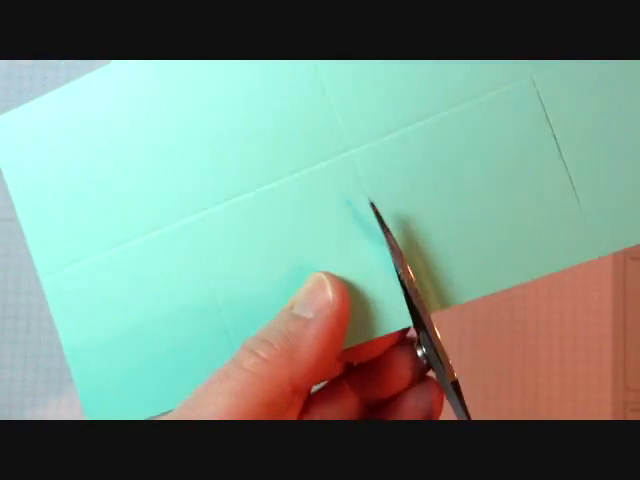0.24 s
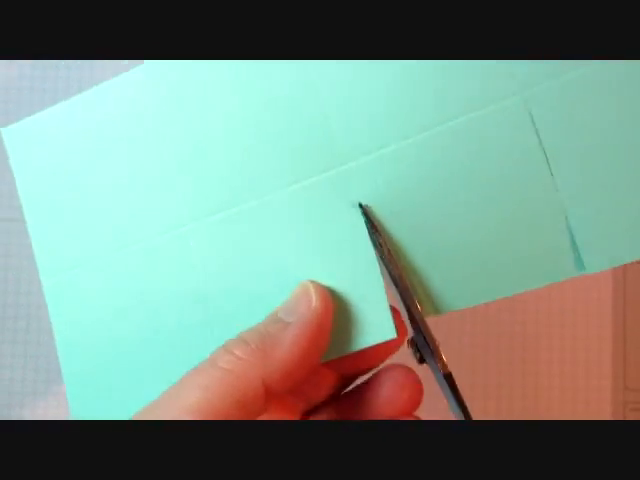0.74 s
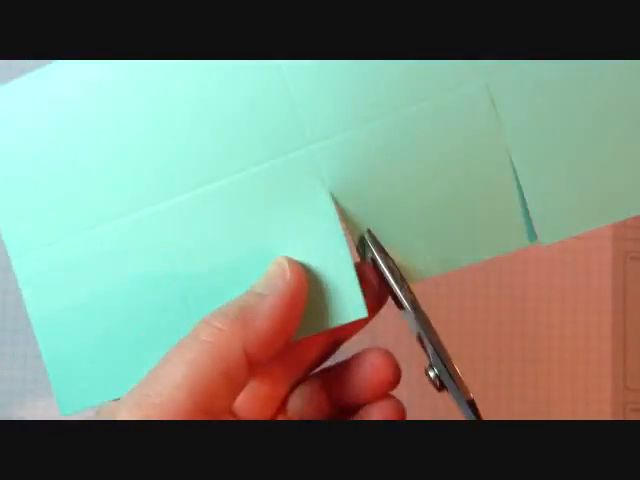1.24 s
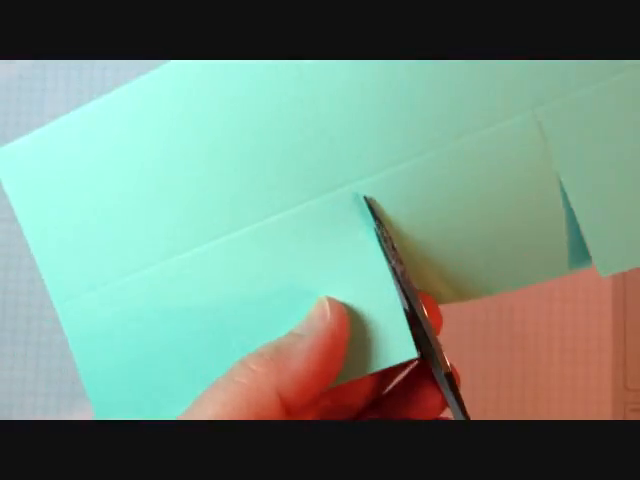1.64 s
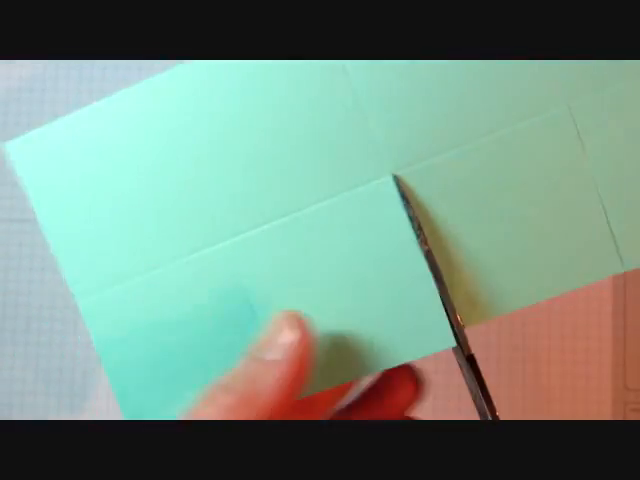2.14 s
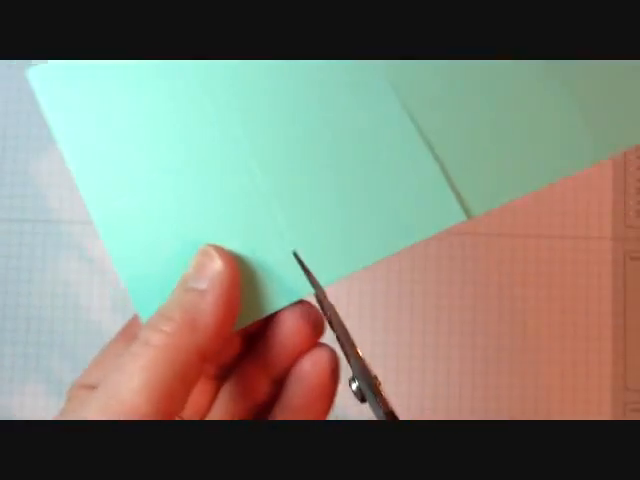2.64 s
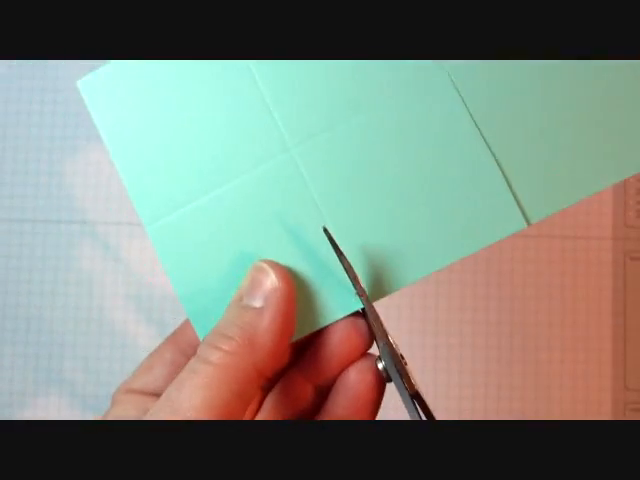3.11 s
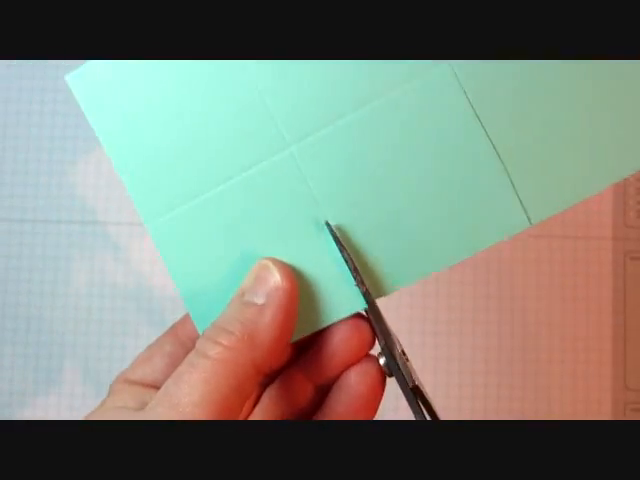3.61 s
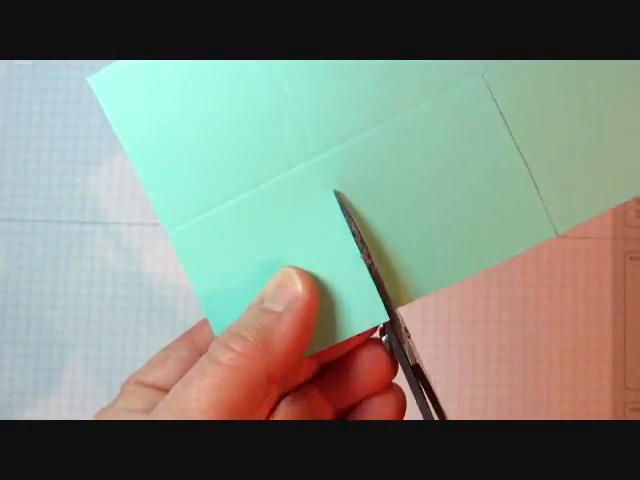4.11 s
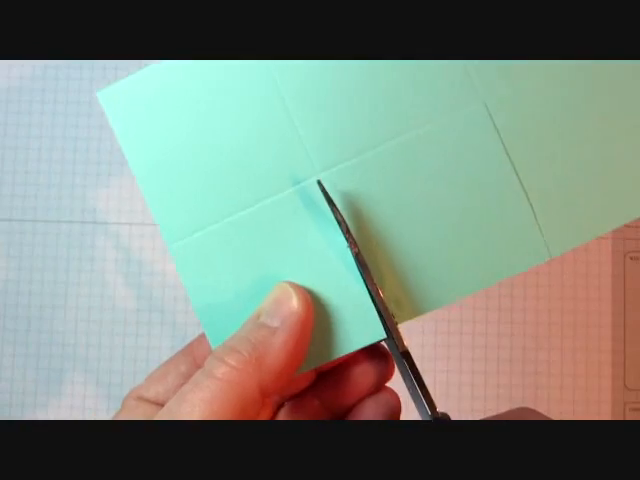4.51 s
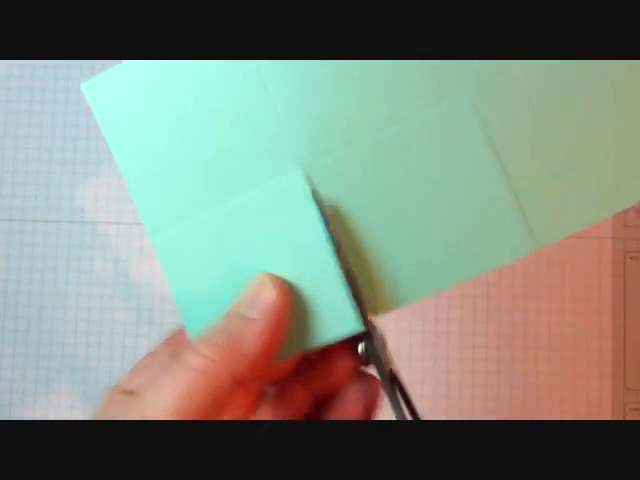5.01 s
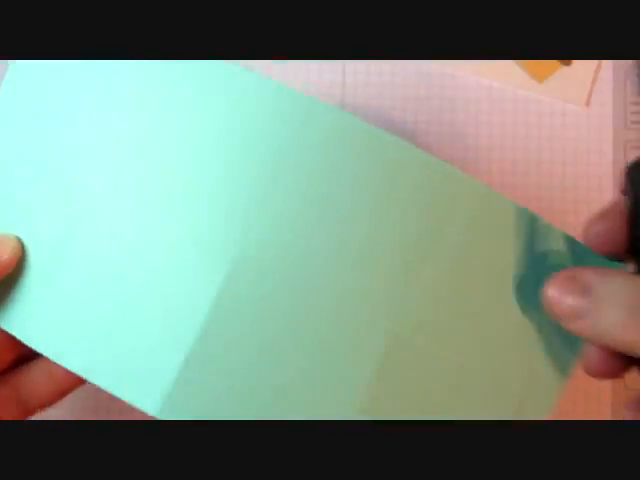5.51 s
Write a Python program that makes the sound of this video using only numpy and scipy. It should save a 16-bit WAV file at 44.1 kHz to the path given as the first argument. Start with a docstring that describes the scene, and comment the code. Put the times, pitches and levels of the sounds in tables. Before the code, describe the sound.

Scissors cut through a sheet of stiff cardstock, close to the microphone in a small room. Short, uneven crunches alternate with soft scrapes of steel along the card and sharp clicks of the blades. Midway the sheet flexes with a hollow crackle, there is a brief lull, and a second run of snips follows. A faint steady hiss lies underneath.

```python
"""At a craft table in a small room, scissors cut two slits in a sheet of cardstock held close by.
Fibres fracture in dense grains, steel slides on the card by stick-slip friction, the sheet buckles
and the blades click shut. These forces excite the resonances of the stiff sheet, the blades and
the room, over faint hiss and a thin electronic whine."""
import sys
import numpy as np
from scipy import signal
from scipy.fft import rfft, irfft
from scipy.io import wavfile
from scipy.ndimage import uniform_filter1d

SR = 44100
rng = np.random.default_rng(int(sys.argv[2]) if len(sys.argv) > 2 else 0)


def store_wav(level_fs):
    """Save 16-bit WAV to argv[1]."""
    pcm = np.round(np.clip(np.atleast_2d(level_fs), -1, 1) * 32767)
    wavfile.write(sys.argv[1], SR, pcm.T.astype(np.int16))


N = 253575
TIME = np.arange(N) / SR
# decay of each kind of stroke once the hand stops pushing
CUT_RELEASE_DB_PER_S, SLIDE_RELEASE_DB_PER_S, BEND_RELEASE_DB_PER_S = 684, 492, 520


def amp(db):
    """Decibels to amplitude ratio."""
    return 10 ** (np.asarray(db) / 20)


def unit_energy(x):
    """Normalisation to an energy of one."""
    return x / np.sqrt(np.sum(x ** 2))


def decay(t, t60):
    """Exponential damping, 60 dB down after t60 seconds."""
    return np.exp(-np.log(1000) * t / t60)


def spectrum_db(points, hz):
    """Spectral envelope: points joined on a log-frequency axis."""
    points_hz, db = np.transpose(points)
    return np.interp(np.log(hz + 1), np.log(points_hz), db)


# Noise spectra, in phase (mid) and opposed (side) at the ears: frequency_hz, relative_density_db
HISS_MID = [(15, -42), (25, -10), (49, -7.5), (67, -6), (86, -9), (213, -9), (243, -4.5), (271, -6.5),
            (529, -9.5), (1310, -2.5), (1810, -9), (3180, -11), (6040, -14.5), (8100, -15.5),
            (15000, -23.5)]
HISS_SIDE = [(15, -36), (25, -9), (181, -8.5), (213, -5.5), (373, -6), (621, -9), (691, 1), (749, -11),
             (856, -4.5), (1150, -6.5), (1240, -7), (3180, -14.5), (3630, -16), (5570, -18.5),
             (15000, -31.5)]
def hiss():
    """Stationary broadband noise, mostly in antiphase between the ears."""
    hz = np.arange(N + 1) * SR / (2 * N)
    def noise(points, rms_db):
        shaped = irfft(rfft(rng.standard_normal(2 * N)) * amp(spectrum_db(points, hz)))[:N]
        return amp(rms_db) * np.sqrt(N) * unit_energy(shaped)
    mid, side = noise(HISS_MID, rms_db=-56.5), noise(HISS_SIDE, rms_db=-46.5)
    return np.array([mid + side, mid - side])


# Partials of the electronic whine: pitch_hz, rms_db
WHINE_PARTIALS = [(7867, -78), (15734, -74)]
def whine():
    """Harmonic pair: two steady pure tones an octave apart."""
    return sum(amp(db) * np.sqrt(2) * np.sin(2 * np.pi * hz * TIME) for hz, db in WHINE_PARTIALS)


# Middle, bass and treble bands: low_hz, high_hz
BAND_EDGES = [(700, 4000), (100, 700), (4000, 16000)]
def crossover(x):
    """Fourth-order crossover filters divide a signal into middle, bass and treble."""
    def twice(v, edge_hz, kind):
        sos = signal.butter(2, edge_hz, kind, fs=SR, output="sos")
        return signal.sosfilt(sos, signal.sosfilt(sos, v))
    low_hz, high_hz = BAND_EDGES[0]
    upper = twice(x, low_hz, "high")
    return twice(upper, high_hz, "low"), twice(x, low_hz, "low"), twice(upper, high_hz, "high")


# Resonances of the held sheet and scissors: frequency_hz, width_hz, lift_db
SHEET_MODES = [(348, 46, 10.5), (444, 40, 11), (625, 224, 11.5), (771, 172, 10), (890, 74, 10.5),
               (1139, 285, 10.5), (1303, 172, 8), (1400, 106, 9.5), (1525, 45, 10), (1760, 287, 11.5),
               (2184, 200, 5.5), (2444, 420, 6), (2896, 23, 5), (3180, 540, 5), (3580, 50, 5.5),
               (4154, 230, 4)]
def sheet_response(radiation, size=4096):
    """Minimum-phase impulse response: resonance peaks on a smooth radiation spectrum."""
    hz = np.arange(size // 2 + 1) * SR / size
    peaks_db = sum(lift / (1 + (2 * (hz - centre) / width) ** 2) for centre, width, lift in SHEET_MODES)
    cepstrum = irfft(np.log(amp(spectrum_db(radiation, hz) + peaks_db)))
    cepstrum[1:size // 2] *= 2  # folding the cepstrum makes the response causal
    cepstrum[size // 2 + 1:] = 0
    return irfft(np.exp(rfft(cepstrum)))


# Natural modes of the steel blades: pitch_hz, relative_level_db, t60_s
STEEL_MODES = [(775, -5, 0.23), (1165, -11, 0.33), (1245, 1, 0.079), (1380, -4, 0.09), (1800, -24.5, 0.097),
               (2175, -7, 0.17), (2325, -11, 0.11)]
def blade_modes(t):
    """Free vibration: one damped sinusoid for each mode."""
    return np.array([amp(db) * decay(t, t60) * np.sin(2 * np.pi * hz * t)
                     for hz, db, t60 in STEEL_MODES])


def transfer_path(radiation, flutter_db, flutter_t60, blade_db, room_db, room_t60, side_db, size=22050):
    """Impulse responses from blade edge to both ears, normalised in each of the three bands."""
    t = TIME[:size]
    noise = rng.standard_normal((4, size))
    flutter = noise[:2] * decay(t, flutter_t60)  # bending waves reflect between the sheet's edges
    room = noise[2:] * decay(t, room_t60) * np.clip(t / 0.014, 0, 1)
    mid = (t == 0) + amp(flutter_db) * unit_energy(flutter[0]) + amp(room_db) * unit_energy(room[0])
    side = amp(side_db) * unit_energy(flutter[1]) + amp(room_db) * unit_energy(room[1])
    sheet = unit_energy(sheet_response(radiation))
    mid, side = (signal.fftconvolve(v, sheet)[:size] for v in (mid, side))
    mid = mid + amp(blade_db) * unit_energy(blade_modes(t).sum(axis=0))
    ears = np.array([mid + side, mid - side])
    return [band / np.linalg.norm(band.mean(axis=0)) for band in crossover(ears)]


# Radiation spectra of the card for each kind of contact: frequency_hz, relative_level_db
TORN_SPECTRUM = [(60, -18), (150, -6.5), (300, 1.5), (500, -5), (1200, -6.5), (2000, -4), (3000, -2),
                 (4500, -1), (8200, -7.5), (11000, -13.5), (16000, -20.5)]
RUBBED_SPECTRUM = [(60, -14.5), (150, -2), (300, -3.5), (500, -8), (1200, -5.5), (2000, -1), (3000, -0.5),
                   (4500, -3), (8200, -10), (11000, -14.5), (16000, -23)]
SNIPPED_SPECTRUM = [(60, -24), (150, -23), (300, -8.5), (500, -10.5), (1200, -5), (2000, -5), (3300, -2),
                    (4500, 1.5), (6500, -7.5), (9000, -7.5), (11000, -12), (16000, -19)]
STRUCK_SPECTRUM = [(60, -11), (150, -7.5), (300, -1.5), (500, -8), (1200, -10.5), (2000, -1.5),
                   (3000, -1.5), (4500, -5), (6500, -9), (8500, -12), (11000, -21), (16000, -29)]
def contact_paths():
    """Mechanical coupling: each kind of contact excites sheet, blades and room in its own proportions."""
    torn = transfer_path(TORN_SPECTRUM, flutter_db=-5, flutter_t60=0.067, blade_db=-14.5,
                         room_db=-18.5, room_t60=0.43, side_db=-15.5)
    rubbed = transfer_path(RUBBED_SPECTRUM, flutter_db=-7.5, flutter_t60=0.016, blade_db=-26,
                           room_db=-14, room_t60=0.49, side_db=-20)
    snipped = transfer_path(SNIPPED_SPECTRUM, flutter_db=-3, flutter_t60=0.02, blade_db=-29.5,
                            room_db=-17, room_t60=0.35, side_db=-14.5)
    struck = transfer_path(STRUCK_SPECTRUM, flutter_db=-5.5, flutter_t60=0.0063, blade_db=-15,
                           room_db=-11, room_t60=0.23, side_db=-31)
    return torn, rubbed, snipped, struck


def radiate(forces, path):
    """Linear superposition: each band's force is convolved with its impulse response."""
    return sum(signal.fftconvolve(force[None], band, axes=1)[:, :N] for force, band in zip(forces, path))


def fibres(grains_per_s, scatter_db, slips_per_s, slip_db, rub_db):
    """Poisson process of uneven fractures, bunched by stick-slip, over smooth rubbing; rms near one."""
    sizes = amp(scatter_db * np.minimum(rng.exponential(size=N), 4))
    grains = (rng.random(N) < grains_per_s / SR) * sizes * rng.choice([-1, 1], N)
    slip_index = np.cumsum(rng.random(N) < slips_per_s / SR)
    grip = amp(slip_db * np.clip(rng.standard_normal(N), -2, 2)[slip_index])
    force = grip * (grains / grains.std() + amp(rub_db) * rng.standard_normal(N))
    # the hand feeds the blades steadily, so short-term power stays even
    return force / np.sqrt(uniform_filter1d(force ** 2, size=900) + 1e-9)


def contact_colour(contacts_per_s=250, spread_db=0.5):
    """Random modulation: each new contact point slightly favours middle, bass or treble."""
    contact_index = np.cumsum(rng.random(N) < contacts_per_s / SR)
    return amp(-spread_db * rng.standard_normal((N, 3))[contact_index].T)


def band_gains(level_db, bass_db, treble_db):
    """Middle, bass and treble amplitudes; bass_db and treble_db are relative to level_db."""
    return amp(level_db + np.array([[0], [bass_db], [treble_db]]))


def stroke_envelope(start_s, attack_s, length_s, rise_db, release_db_per_s):
    """Envelope of one push: the force builds, rises or sags steadily, then decays exponentially."""
    age = TIME - start_s
    held_db = rise_db * (np.clip(age / length_s, 0, 1) - .5)
    released_db = release_db_per_s * np.clip(age - length_s, 0, .5)
    return np.clip(age / attack_s, 0, 1) * amp(held_db - released_db)


def stroke_effort(strokes, release_db_per_s):
    """Incoherent addition: overlapping strokes sum in power to a force envelope for each band."""
    power = np.zeros((3, N))
    for start, attack, length, db, rise, bass, treble, *_ in strokes:
        envelope = stroke_envelope(start, attack, length, rise, release_db_per_s)
        power += (band_gains(db, bass, treble) * envelope) ** 2
    return np.sqrt(power)


def resonance(starts_s, pitches_hz, force, width_hz):
    """Forced vibration of one card mode, retuned as each stroke changes the free length; rms one."""
    stroke_index = np.maximum(np.searchsorted(starts_s, TIME) - 1, 0)
    carrier = np.exp(2j * np.pi * np.cumsum(pitches_hz[stroke_index]) / SR)
    pole = np.exp(-np.pi * width_hz / SR)
    ring = (carrier * signal.lfilter([1], np.poly([pole, pole]), force / carrier)).imag
    return ring / ring.std()


def hollow_note(strokes, release_db_per_s, crunch_effort, width_hz):
    """Narrow resonance: during each stroke the card sounds a note as strongly as it is worked."""
    starts, *_, pitches, _ = np.transpose(strokes)
    drive = np.hypot(stroke_effort(strokes, release_db_per_s)[0], crunch_effort[0])  # middle band only
    share = sum(amp(note_db) * stroke_envelope(start, attack, length, 0, release_db_per_s)
                for start, attack, length, *_, note_db in strokes)
    force = fibres(grains_per_s=640, scatter_db=0, slips_per_s=150, slip_db=2, rub_db=3)
    return drive * share * resonance(starts, pitches, force, width_hz)


# Slides along the card: start_s, attack_s, length_s, level_db, rise_db, bass_db, treble_db
SLIDE_STROKES = [(0.49, 0.014, 0.057, -63.5, -7, -2.5, -1), (0.67, 0.014, 0.047, -51, -1, -3, -5),
                 (0.78, .01, 0.021, -42.5, -9, -6, -12), (0.893, 0.0041, 0.0093, -40, -15, -12, -15),
                 (1.03, 0.034, 0.047, -45, 5.5, -12, -9), (1.08, 0.021, 0.036, -46.5, 0, -7.5, 5.5),
                 (1.13, .01, 0.059, -50.5, 5, -7, -4.5), (1.2, .008, 0.022, -43, -1, -11, -11),
                 (1.24, 0.023, 0.05, -48, -8.5, -18, -3.5), (1.498, 0.0025, 0.06, -39, -6, -9, -16),
                 (1.533, 0.016, .11, -41.5, 10, -10.5, -12), (1.68, 0.039, 0.049, -42, -1, -7.5, -8.5),
                 (1.785, 0.017, 0.09, -41, 8, -12.5, -13.5), (1.953, 0.023, 0.037, -45, 1, -6, -17),
                 (2.02, 0.012, 0.042, -54, -4, -4, -18), (2.12, .04, 0.069, -58, 5, -9, -19),
                 (3.17, 0.075, 0.1, -62.5, -6, 4, -4), (3.52, 0.036, 0.12, -49.5, 4, -8.5, -2.5),
                 (3.6, 0.082, 0.11, -43, 2, -9, -2), (3.725, 0.021, 0.021, -37, -2, -14.5, -3.5),
                 (3.853, 0.0067, 0.054, -47, -9.5, -15, -2), (3.985, .01, 0.046, -44, 7, -7, -17),
                 (4.12, 0.023, 0.076, -45, -9, -8, -13), (4.415, 0.031, 0.037, -36, 2, -13, -10),
                 (4.49, .005, 0.095, -50, -7, -4, -0.5), (4.565, 0.0086, .12, -49, 2.5, -11, -11.5),
                 (4.69, 0.015, 0.093, -49.5, -2.5, -18, -5), (4.98, 0.036, 0.035, -48, 0, -7, -15),
                 (5.42, 0.022, 0.18, -63.5, 7, -9, -1), (5.665, 0.0036, 0.0082, -45, -8, -6.5, -6)]
def sliding(path):
    """Sliding friction: flat steel and skin rub the card with a fine, smooth grain."""
    effort = stroke_effort(SLIDE_STROKES, SLIDE_RELEASE_DB_PER_S) * contact_colour()
    grains = fibres(grains_per_s=5000, scatter_db=2.5, slips_per_s=160, slip_db=3, rub_db=-3)
    return radiate(effort * grains, path)


# Flat of the blade on the cut edge: start_s, attack_s, length_s, level_db, rise_db, pitch_hz
RASP_STROKES = [(0.04, .015, .11, -48.5, -15, 3600), (1.52, .035, 0.11, -40.5, -9, 3430),
                (3.55, .09, .15, -46.5, 10, 4900), (4.207, .025, 0.065, -43, -2, 4500)]
def rasping():
    """Stick-slip chatter of the cut edge along the steel drives a broad, high resonance."""
    starts, *_, pitches = np.transpose(RASP_STROKES)
    envelope = sum(amp(db) * stroke_envelope(start, attack, length, rise, SLIDE_RELEASE_DB_PER_S)
                   for start, attack, length, db, rise, _ in RASP_STROKES)
    force = fibres(grains_per_s=2100, scatter_db=9, slips_per_s=630, slip_db=3, rub_db=6)
    return envelope * resonance(starts, pitches, force, width_hz=2500)


# Flexing of the sheet as it is moved along:
# start_s, attack_s, length_s, level_db, rise_db, bass_db, treble_db, pitch_hz, relative_note_db
BEND_STROKES = [(0.04, 0.026, 0.13, -48, -13, -11, -3.5, 458, -4),
                (2.36, 0.024, 0.031, -37, 1, 1, -5.5, 374, -7),
                (2.405, 0.013, 0.047, -43, 1, 2, -7.5, 390, -1),
                (2.492, 0.0028, 0.026, -41, 7, -25, -9.5, 440, -8),
                (2.53, 0.03, 0.048, -31, -8, -24, -6, 614, -3),
                (2.584, 0.0061, 0.028, -44, -4, 2, -11, 438, -2.5),
                (2.66, 0.01, 0.021, -44, -7, -10, -11, 463, -8),
                (2.765, 0.0045, 0.043, -66, -12, 3, -2, 231, 7.5),
                (2.885, 0.02, .05, -54, -3, -4.5, -6, 503, -4.5)]
def bending(path):
    """Buckling: the flexing sheet crackles in coarse, uneven bursts."""
    effort = stroke_effort(BEND_STROKES, BEND_RELEASE_DB_PER_S) * contact_colour()
    grains = fibres(grains_per_s=790, scatter_db=3, slips_per_s=150, slip_db=10, rub_db=0.5)
    return radiate(effort * grains, path)


# Runs of fibres giving way at once: peak_s, swell_s, level_db, bass_db, treble_db
AVALANCHES = [(0.074, 0.007, -36.5, 1, -12), (0.135, 0.0072, -38, -24, -8.5), (0.274, 0.0075, -32, -3, -15),
              (0.289, 0.0039, -33.5, -25, -8), (0.464, 0.0077, -46.5, -10.5, -36),
              (0.691, 0.0054, -41, 0, -5.5), (0.772, 0.0081, -29, -7.5, -4.5), (1.201, 0.0044, -34, -20, 1),
              (1.766, 0.0092, -27.5, -9, -9.5), (2.21, 0.0032, -31.5, -12, -13),
              (2.235, 0.0068, -27.5, -22, -11), (2.268, 0.0075, -31, -11, -9),
              (2.296, 0.0044, -30, -5, -6.5), (2.353, 0.0053, -25.5, -16, -7.5),
              (2.395, 0.008, -29.5, -18, -17), (2.539, 0.005, -33, -17, -4), (2.557, .003, -28.5, -5, -8),
              (2.572, 0.0069, -24, -4.5, -28), (2.86, 0.011, -45, -1.5, 0.5), (3.969, 0.0029, -34.5, 6, -3),
              (4.027, 0.0038, -38.5, -27, -10), (4.301, 0.0057, -30, -16, -6),
              (4.322, 0.0043, -29.5, -1.5, -18), (4.861, 0.0018, -42, -2.5, -35),
              (5.098, 0.0033, -37.5, -23, -1), (5.126, 0.0059, -38.5, 0, -9),
              (5.146, 0.0077, -37.5, -6, -31), (5.308, 0.0055, -33, -5.5, -15),
              (5.339, 0.0024, -30, -22, -6.5)]
def avalanche_effort():
    """Fracture avalanches: the force envelope in each band swells and dies away symmetrically."""
    effort = np.zeros((3, N))
    for peak_s, swell_s, db, bass, treble in AVALANCHES:
        swell = 1 / np.cosh(np.clip(1.65 * (TIME - peak_s) / swell_s, -20, 20))
        effort += band_gains(db, bass, treble) * swell
    return effort


def crunching(path, crunch_effort):
    """Acoustic emission: dense fractures with almost no rubbing make a short crunch."""
    effort = crunch_effort * contact_colour()
    grains = fibres(grains_per_s=3500, scatter_db=5, slips_per_s=570, slip_db=-1, rub_db=-20)
    return radiate(effort * grains, path)


# Blades catching, closing and knocking on the card:
# time_s, middle_peak_db, bass_db, treble_db, ring_hz, relative_chatter_db
BLADE_IMPACTS = [(0.277, -16, -30, -25, 1070, -7), (0.712, -27, -18, -14, 1180, -9),
                 (0.771, -36, -31, -15, 670, 4), (0.844, -37.5, -3, -2.5, 1320, 1),
                 (0.879, -27.5, -19, -15, 1400, 14), (0.995, -33, -2, -25, 770, -7),
                 (1.499, -22, -8, -1.5, 1470, -4.5), (1.682, -31, -2.5, -4.5, 880, 7),
                 (1.754, -19.5, -7, -18, 1340, -6), (1.771, -20, -20, 2, 1350, 7),
                 (1.879, -15.5, -7.5, -17, 720, -8), (2.492, -20.5, 0, -2.5, 2130, -3),
                 (2.53, -20.5, -4, 4, 1300, -2), (2.566, -17.5, -3, 0.5, 616, 7.5),
                 (2.717, -35, -2.5, -3.5, 1460, 7), (3.911, -23.5, 0, 5.5, 3700, -1),
                 (3.921, -19.5, -10, 5.5, 3370, 4.5), (4.092, -23, -3.5, -6, 1470, -1),
                 (4.152, -30.5, -15, -1, 1270, -14), (4.269, -22, -7.5, -21, 1330, -15),
                 (4.321, -19, -24, -35, 830, -6), (4.45, -7, -9, -6, 1400, -2),
                 (4.485, -14, -42, -32, 2250, -1.5), (4.644, -27, -7, -28, 2270, 3),
                 (5.07, -21.5, -16, -2, 1220, -6), (5.114, -18, -24, -25, 880, -1),
                 (5.307, -23, -2, -22, 1210, -8), (5.338, -24, -15, -15, 1400, -19),
                 (5.706, -36, -18, -6, 4360, 3)]
def clicking(path, contact_s=0.001, size=8000):
    """Impact excitation: the edges creak as they load up, then strike, ring briefly and chatter."""
    forces, t = np.zeros((3, N + size)), TIME[:size]
    modes = blade_modes(t)
    for time_s, db, bass, treble, ring_hz, chatter_db in BLADE_IMPACTS:
        noise = rng.standard_normal((3, size))
        creak = amp(-16) * unit_energy(noise[0] * decay(t, t60=0.035))[::-1]  # swells into the blow
        ring = amp(-10) * unit_energy(np.cos(2 * np.pi * ring_hz * t) * decay(t, t60=0.007))
        chatter = amp(chatter_db) * unit_energy(noise[1] * decay(t, t60=0.022))
        # each contact point weights the blade modes differently
        steel = amp(-22) * unit_energy(noise[2, :len(modes)] @ modes)
        blow = np.concatenate([creak, (t == 0) + ring + chatter + steel])
        middle_peak = np.abs(signal.fftconvolve(blow, path[0].mean(axis=0)[:size])).max()
        strike = int((time_s + contact_s) * SR)
        forces[:, strike - size:strike + size] += band_gains(db, bass, treble) * blow / middle_peak
    return radiate(forces[:, :N], path)


# Blades shearing the card:
# start_s, attack_s, length_s, level_db, rise_db, bass_db, treble_db, pitch_hz, relative_note_db
CUT_STROKES = [(0.003, 0.095, 0.15, -37, -7.5, -11, -9.5, 1154, -6.5),
               (2.184, 0.01, 0.083, -39, 5, -11, -11, 877, -10),
               (2.291, .004, 0.033, -39, 4, -17, -6.5, 870, 2),
               (2.343, 0.0072, 0.031, -43.5, 3, 0.5, -0.5, 900, -7),
               (3.918, 0.0048, 0.054, -38.5, 9.5, -9, -9, 920, -7),
               (4.196, 0.011, 0.12, -37.5, 2, -16, -7.5, 925, -15),
               (4.452, 0.0036, 0.027, -43, -4, -17, -4, 1240, -5),
               (5.06, 0.0045, 0.089, -37.5, 7, -14, -11, 843, -3.5),
               (5.24, 0.025, 0.11, -39.5, 0.5, -9.5, -8, 1166, -3.5),
               (5.724, 0.0087, 0.027, -38, -8, -16, -6.5, 1090, -23)]
def cutting(path):
    """Shear fracture: the crossing point of the blades tears through the fibres."""
    effort = stroke_effort(CUT_STROKES, CUT_RELEASE_DB_PER_S) * contact_colour()
    grains = fibres(grains_per_s=1600, scatter_db=3.5, slips_per_s=260, slip_db=3.5, rub_db=-5)
    return radiate(effort * grains, path)


def scene():
    """Superposition of the card's grains and notes, the blades' rasps and clicks, and the background."""
    torn, rubbed, snipped, struck = contact_paths()
    crunch_effort = avalanche_effort()
    card = cutting(torn) + bending(torn) + sliding(rubbed) + crunching(snipped, crunch_effort)
    # the strip beside the blades resonates in a cut; the whole bowed sheet, deeper, in a bend
    strip_note = hollow_note(CUT_STROKES, CUT_RELEASE_DB_PER_S, crunch_effort, width_hz=92)
    sheet_note = hollow_note(BEND_STROKES, BEND_RELEASE_DB_PER_S, crunch_effort, width_hz=105)
    return card + strip_note + sheet_note + rasping() + clicking(struck) + hiss() + whine()


def record(dry):
    """Band limiting: a steep low-pass filter removes the treble above 16 kHz."""
    return signal.sosfilt(signal.ellip(10, .1, 70, 16000, fs=SR, output="sos"), dry)


dry = scene()
out = record(dry)
store_wav(out)
```